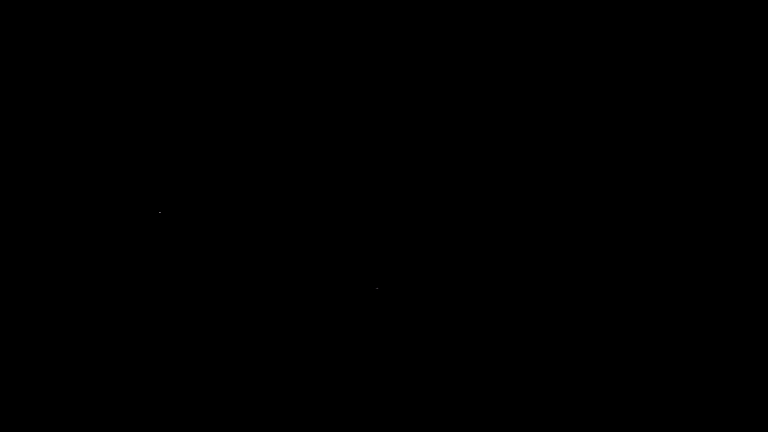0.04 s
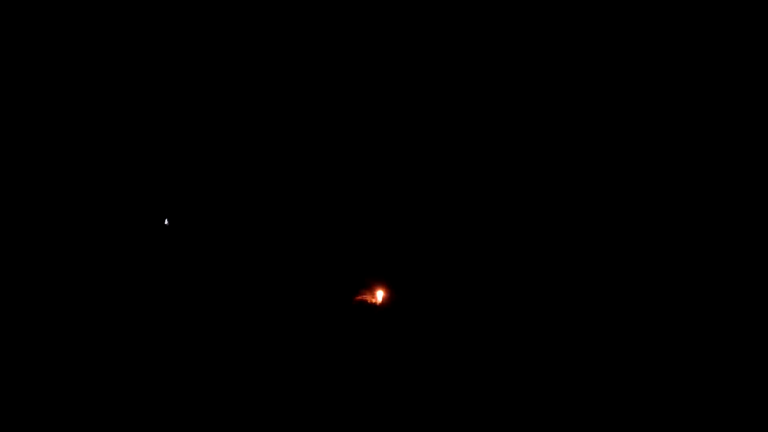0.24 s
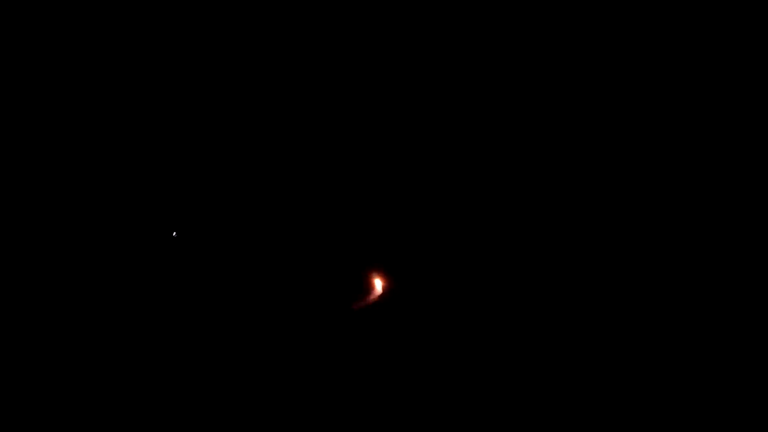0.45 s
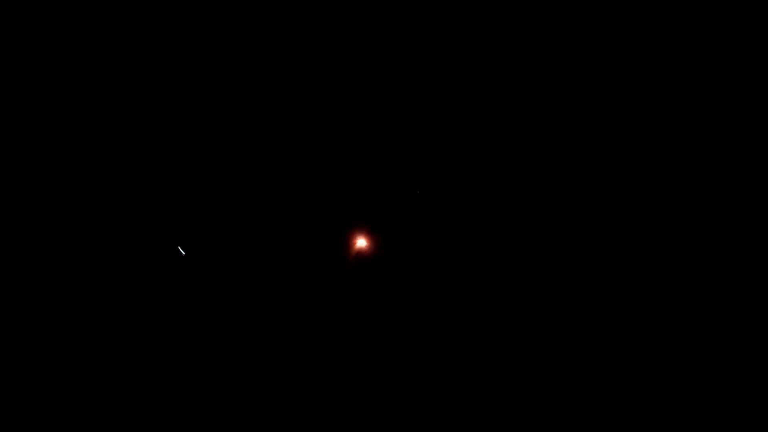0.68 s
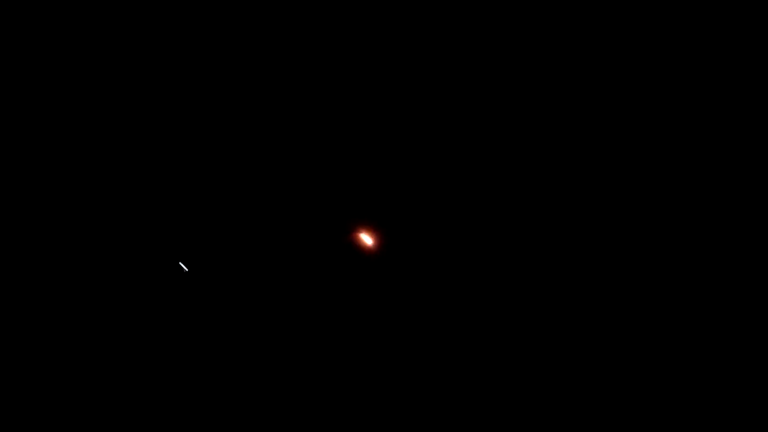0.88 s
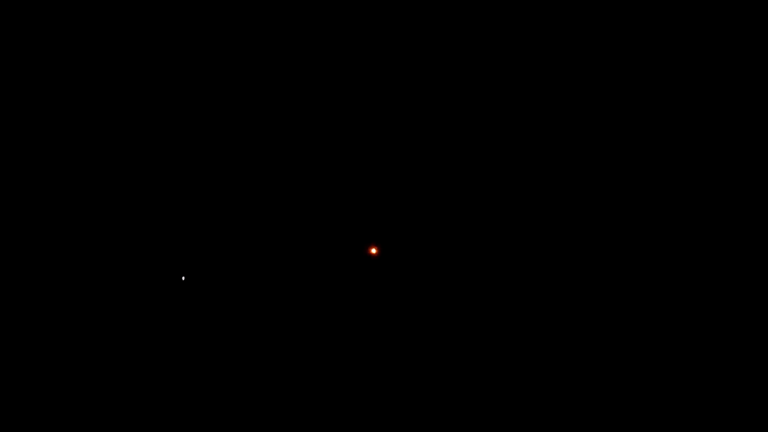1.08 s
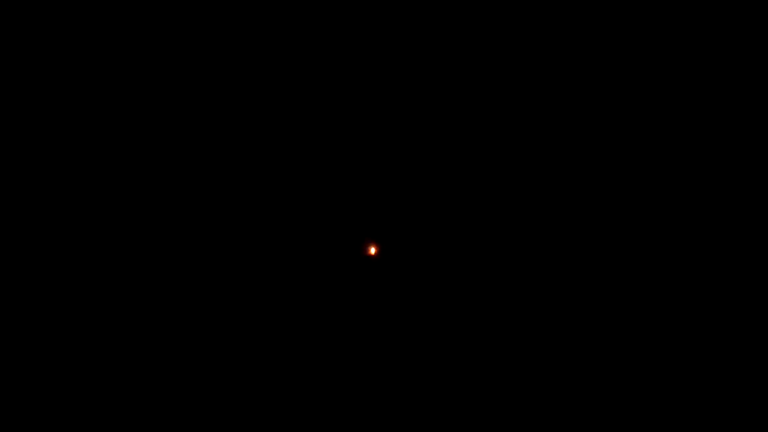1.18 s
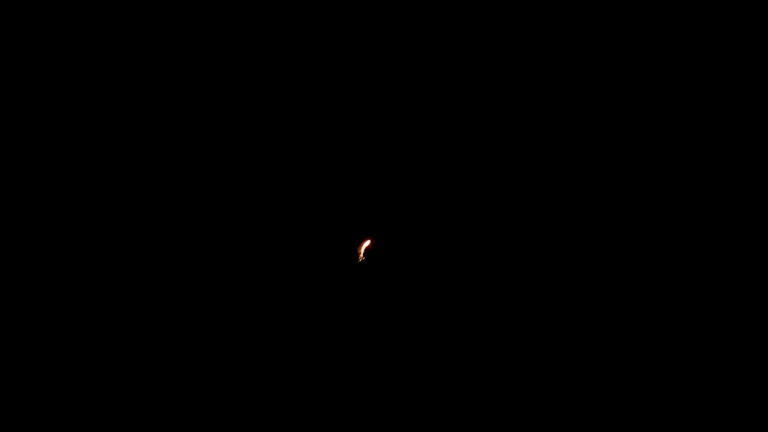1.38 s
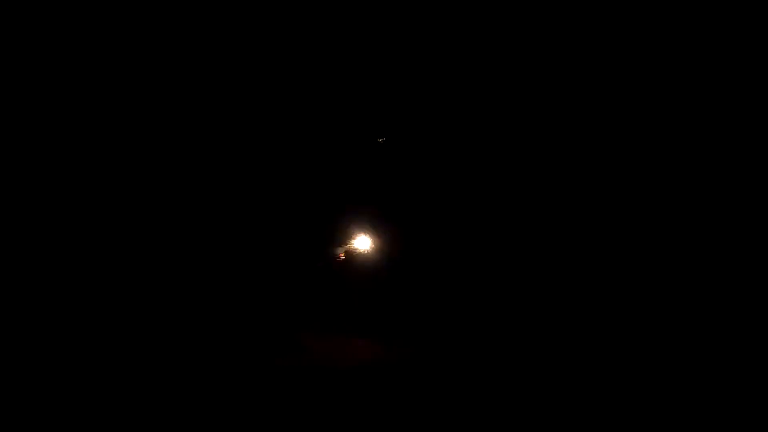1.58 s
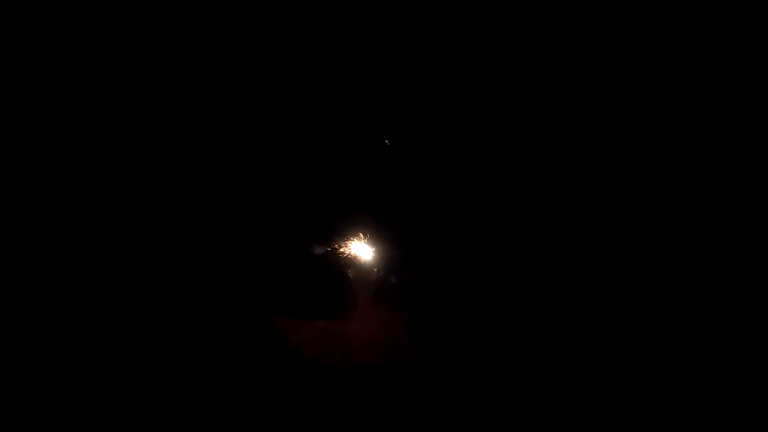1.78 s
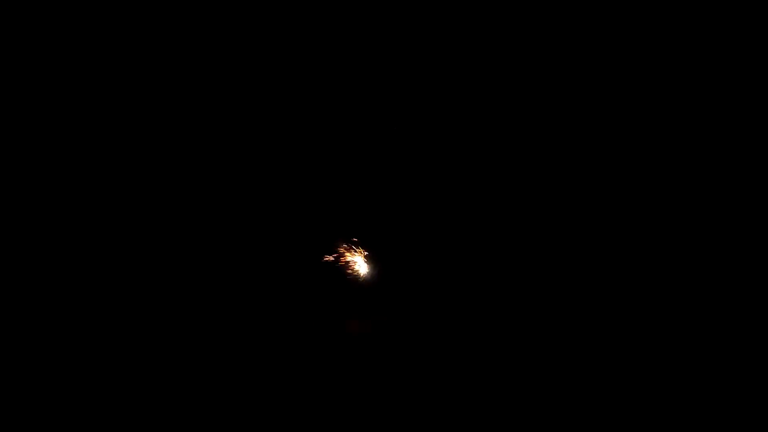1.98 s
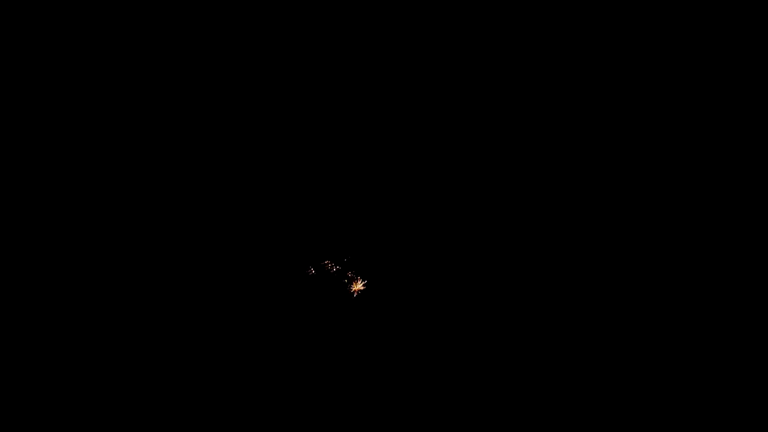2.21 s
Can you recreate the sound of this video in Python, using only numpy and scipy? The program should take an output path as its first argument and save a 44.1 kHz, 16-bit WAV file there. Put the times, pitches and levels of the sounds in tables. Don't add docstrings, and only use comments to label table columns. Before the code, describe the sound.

A firework rocket whistles shrilly as it climbs, stops, then bursts into sharp dry crackles.

```python
import sys
import numpy as np
from scipy import signal
from scipy.fft import rfft, irfft, next_fast_len
from scipy.io import wavfile
from scipy.ndimage import uniform_filter1d, map_coordinates

SR = 44100
rng = np.random.default_rng(int(sys.argv[2]) if len(sys.argv) > 2 else 0)


def natural_amplitude(level_db):
    exponent = np.asarray(level_db, float) / 20
    return 10 ** exponent


def unload_wav(signal):
    wavfile.write(
        sys.argv[1],
        SR,
        np.round(np.clip(np.atleast_2d(signal).T, -1, 1) * 32767).astype(np.int16),
    )


N = 99225
T = np.arange(N) / SR
LIGHT_S, OUT_S = 0.246, 1.288


def unit(x):
    return x / np.sqrt(np.mean(x ** 2, axis=-1, keepdims=True) + 1e-20)


def along(points, hz):
    f, v = np.transpose(points)
    return np.interp(np.log(hz + 1), np.log(f + 1), v)


def curves(rows):
    s, *cols = np.transpose(rows)
    return [np.interp(T, s, c) for c in cols]


def wobble(rate):
    return map_coordinates(rng.standard_normal(3000), [T * rate])


def filtered(x, response):
    m = next_fast_len(N + SR // 2)
    return irfft(rfft(x, m) * response(np.fft.rfftfreq(m, 1 / SR)), m)[..., :N]


def noise(spectrum):
    return unit(filtered(rng.standard_normal(N), lambda hz: natural_amplitude(along(spectrum, hz))))


# (time [s], pitch [Hz])
PITCH = [(.247, 2110), (.256, 2110), (.288, 2202), (.33, 2096), (.37, 2058), (.6, 1940), (.83, 1820),
         (1.11, 1726), (1.28, 1686)]


def pulse_phase():
    hz = uniform_filter1d(curves(PITCH)[0], SR // 100)
    flick = 71 * np.exp(-np.abs(OUT_S - T) / 0.0077)
    hz = hz + flick + 4.7 * wobble(89.84)
    return hz, 2 * np.pi * np.cumsum(hz) / SR


def pair(turn, pan_db, lead):
    share = natural_amplitude([pan_db / 2, -pan_db / 2])
    mean_size = np.abs(share[0] + share[1] * np.exp(1j * lead))
    both = np.maximum(mean_size, .7 * share.max(0))
    return 2 * share / both * np.sin([turn, turn - lead])


# (time [s], level [dB], left-right [dB])
BURN = [
    [(0.25, -15.5, 6.5), (0.28, -15, -4), (0.372, -22.5, 12.5), (0.41, -17, -1), (0.586, -22, 13.5),
     (0.616, -14.5, 15), (0.652, -19.5, -3), (0.69, -11, -4), (0.75, -24, -11)],
    [(0.765, -23.5, -4), (0.837, -12, 2), (0.881, -18, 4), (0.983, -21, 1), (0.997, -32, 6),
     (1.033, -20.5, -12.5), (1.133, -25.5, -4), (1.189, -23.5, 1), (1.285, -29.5, 2.5)],
]
# (time [s], second [dB], third [dB], fourth [dB])
OVERTONES = [
    [(.25, -23, -14.5, -34), (.3, -23, -16.5, -44), (.35, -27, -25, -35), (.42, -29, -24.5, -30),
     (.52, -28, -33, -36), (.57, -28, -36, -24), (.615, -20.5, -25.5, -23), (.7, -23, -27.5, -18),
     (.74, -22.5, -30.5, -27)],
    [(.775, -38.5, -23.5, -20), (.825, -26, -24.5, -17), (.88, -35.5, -23.5, -20),
     (.945, -36.5, -25.5, -24), (.99, -38.5, -31, -33), (1.035, -35, -29.5, -24), (1.11, -34, -34.5, -27),
     (1.18, -35.5, -31.5, -31), (1.28, -43.5, -35, -29)],
]
# (time [s], second [dB], third [dB], fourth [dB])
FACING = [(.27, 12, -19, 3), (.33, 10, -12, 11), (.55, 14, 1, -4), (.7, 3.5, 9, -9), (.81, -13, -1.5, -23),
          (.99, 8, -0.5, -15), (1.05, -5, -2, -9), (1.279, 4.5, -2, -5)]
# (time [s], tone [rad], second [rad], third [rad], fourth [rad])
LEAD = [(.27, -0.6, 0.73, 1.2, 0.5), (.38, 1.84, 1.5, -2.5, 2.5), (.54, -4.5, 1.6, -2.5, 2.5),
        (.63, -4.2, 2.24, -5.5, 1.1), (.72, -5, 1.8, -5, 1.8), (.87, -4.5, 4.2, -5.5, -0.2),
        (.99, -4.5, 4.4, -5.5, -0.5), (1.08, -5, 5.9, -7.5, -1), (1.28, -5.5, 4, -7.5, -0.6)]
HIGH_DB = [-17.5, -20, -22.5]
# (time [s], treble [dB])
EDGE = [(.25, 5.5), (.35, 0), (.58, 8.5), (.7, -3), (.85, -9), (1.28, -22.5)]
# (frequency [Hz], gain [dB])
GROUND = [(300, 0), (700, -4.5), (1100, 3.5), (1330, -5.5), (1600, -0.5), (14000, -5.5), (14600, -35),
          (16000, -35)]
# (frequency [Hz], gain [dB])
LEFT = [(300, -16.5), (2000, 0.5), (5000, -13), (8300, -7.5), (9500, -8), (12500, -36), (15000, -4)]
# (frequency [Hz], gain [dB])
RIGHT = [(300, -12.5), (2000, -6), (5700, -7), (6500, -2), (7300, -3.5), (9000, -8), (11800, 0),
         (15000, -4.5)]


def whistle_tone(hz, turn):
    fade_db, fade_rate, rough = 1.5, 14, 0.094
    level_db, pan_db = curves(BURN[0] + BURN[1])
    lead, *leads = curves(LEAD)
    sound = natural_amplitude(level_db + 4.5) * pair(turn, pan_db, lead)

    low_db = curves(OVERTONES[0] + OVERTONES[1])
    for k, db, pan, lag in zip((2, 3, 4), low_db, curves(FACING), leads):
        fading = natural_amplitude(db + 3.0 + fade_db * wobble(fade_rate))
        sound += fading * (1 + rough * wobble(400)) * pair(k * turn, pan, lag)

    edge_db = curves(EDGE)[0]
    for k, db in enumerate(HIGH_DB, 5):
        air_db = edge_db * k / 5 + along(GROUND, k * hz)
        port_db = np.array([along(LEFT, k * hz), along(RIGHT, k * hz)])
        twinkle = natural_amplitude(fade_db * np.array([wobble(fade_rate), wobble(fade_rate)]))
        partial = np.sin(k * turn + rng.uniform(0, 2 * np.pi, (2, 1)))
        sound += natural_amplitude(db + air_db + port_db) * twinkle * (1 + rough * wobble(400)) * partial
    return sound


# (time [s], level [dB])
STUTTER = [(.25, -24.5), (.33, -28.5), (.38, -17), (.46, -24), (.56, -22), (.68, -29), (.8, -52),
           (1.29, -45)]
HALF_DB = [-22, -16, -0.5, -16, -18.5]


def stutter(turn):
    ragged = sum(natural_amplitude(db) * wobble(260) * np.sin((k + 1.5) * turn) for k, db in enumerate(HALF_DB))
    return natural_amplitude(curves(STUTTER)[0]) * ragged


# (frequency [Hz], level [dB])
JET = [(300, -20.5), (1000, -3.5), (2400, -5.5), (3200, -0.5), (4800, -6.5), (7000, 6), (14000, -5.5)]


def jet_hiss():
    roar = noise(JET[:5] + [(6000, -40)])
    fizz = noise([(4000, -40)] + JET[4:])
    level_db = curves(BURN[0] + BURN[1])[0]
    steady_db = uniform_filter1d(level_db, SR // 4) - 18.5
    roar_db = 7 * (T - 1.46) + 1.96 * wobble(39.7)
    fizz_db = 2 + 0.74 * curves(EDGE)[0] + 3.4 * wobble(90.5)
    return natural_amplitude(steady_db) * (natural_amplitude(roar_db) * roar + natural_amplitude(fizz_db) * fizz)


def fuse():
    burning = (T > 0.197) * (T < LIGHT_S)
    return burning * natural_amplitude(-38 - 348 * np.abs(LIGHT_S - T)) * noise(JET[2:])


def puff(s, db, t60):
    return (T > s) * natural_amplitude(db - 60 * np.abs(T - s) / t60) * noise(JET)


def whistle():
    hz, turn = pulse_phase()
    lit = np.clip((T - LIGHT_S) / 0.0013, 0, 1) * np.clip((OUT_S - T) / 0.0049, 0, 1)
    gas = lit * (jet_hiss() + stutter(turn)) + fuse()
    gas = gas + puff(LIGHT_S, -27.5, 0.19) + puff(OUT_S, -45, 0.054)
    return lit * whistle_tone(hz, turn), gas


# time [s], peak [dB], answer of the near surface [dB], brightness [dB]
FIRST_POP = (1.6323, -26, -3, 0)
# (time [s], peak [dB], answer of the near surface [dB], brightness [dB])
POPS = [(1.6609, -7.5, -2.5, 7.5), (1.679, -28, -11, 1), (1.6917, -22, -2, -10.5), (1.6966, -24, -1, 2),
        (1.705, -13, -2, 14.5), (1.7087, -12.5, -3, 3), (1.7353, -29.5, -6, -5.5), (1.7765, -26, -7, 5),
        (1.7823, -20.5, -8, -2), (1.7848, -16.5, -3, -2), (1.7979, -9, -6.5, 0), (1.808, -16, -2.5, 11),
        (1.8188, -7.5, -3.5, 3.5), (1.822, -24, -7, -3), (1.836, -22.5, 3, 6), (1.8566, -8.5, -3, 0),
        (1.8719, -12.5, 1.5, 9), (1.909, -12, 1.5, 9), (1.9129, -5.5, -3, 5.5), (1.9183, -9.5, -8, 7),
        (1.925, -18, -0.5, 7), (1.929, -19.5, -4, 3), (1.9325, -26, -10, 5), (1.9385, -28, -6, 0),
        (1.9546, -2, -5, 8), (1.9612, -18, 2, 0), (1.9702, -35, -10.5, 3), (1.9775, -4.5, -2, -1.5),
        (1.9869, -9.5, -4, -7), (1.9934, -24, -7, -3), (1.9988, -20.5, -4, 4), (2.0027, -21, -18, -2),
        (2.0193, -24, -1, -4), (2.023, -4.5, -2.5, -5), (2.0321, -26, -7, -1), (2.0363, -6.5, -6, -1),
        (2.0407, -17, -5, 2), (2.0451, -25, -11, -1), (2.051, -17, -15, 4), (2.0676, -15.5, -1, 1),
        (2.0849, -9, -2.5, 0.5), (2.1174, -6.5, -4, 1), (2.1408, -27, -3, -2), (2.1469, -16.5, -1.5, 0.5),
        (2.1626, -10.5, -7, 2), (2.1783, -12, -1.5, 16), (2.2083, -3.5, -7, 3.5), (2.2102, -28, -6, 2.5)]
# (time [s], level [dB])
SPARKS = [
    (1.66, -59),
    (1.7, -47),
    (1.76, -48),
    (1.89, -51.5),
    (1.92, -35.5),
    (1.95, -40),
    (2.0, -43),
    (2.04, -37.5),
    (2.07, -61),
    (2.25, -50),
]


def crackle():
    out, t = np.zeros((2, N + SR)), np.arange(900) / SR
    chance = rng.random((int(700 * 0.61), 4))
    when = 1.65 + .6 * chance[:, 0]
    size_db = np.interp(when, *np.transpose(SPARKS)) - 3.5 * np.log(chance[:, 1])
    sparks = zip(when, size_db, -9 * chance[:, 2], 9 * chance[:, 3] - 3)
    for s, db, answer_db, bright_db in [FIRST_POP, *POPS, *sparks]:
        late = np.append(0, 0.0005 * rng.exponential(size=3))[:, None]
        size = np.append(1, natural_amplitude(-5) * rng.standard_normal(size=3))
        pulse_s = 58.6e-6 * natural_amplitude(-0.66 * bright_db)
        u = np.maximum(t - late, 0) / pulse_s
        blast = size @ ((t >= late) * np.exp(-u / 2) * np.cos(2 * u))
        dust = natural_amplitude(-11 - 60 * t / 0.0095) * rng.standard_normal((2, len(t)))
        level = natural_amplitude([[db + 1], [db + 1 + answer_db]])
        out[:, round(s * SR):][:, :len(t)] += level * (blast + dust)
    return out[:, :N]


# (delay [ms], left [dB], right [dB])
PATHS = [
    (0.404, 10, -8),
    (0.666, 9.5, 1.5),
    (.85, 1.5, -35),
    (1.786, 4.5, 16),
]


def ports(x, paths):
    ms, left_db, right_db = np.transpose(paths)

    def ways(hz, db):
        delays = np.exp(-2j * np.pi * np.outer(hz, ms / 1000))
        return delays @ natural_amplitude(db) * natural_amplitude(along(GROUND, hz))

    def response(hz):
        left = natural_amplitude(along(LEFT, hz)) * ways(hz, left_db)
        right = natural_amplitude(along(RIGHT, hz)) * ways(hz, right_db)
        return [left, right]

    return filtered(x, response)


# (frequency [Hz], t60 [s])
FAR = [(500, .5), (2000, 1.64), (5500, 1.58), (7000, 0.92), (12000, 2.04)]
# (frequency [Hz], gain [dB])
YARD = [(500, 4.5), (2000, 0.5), (7000, 0.5), (9000, -0.5), (15000, -8)]


def echoes(x):
    far_db, hill_db = -21, -41
    hz, t, z = signal.stft(rng.standard_normal((2, SR + SR // 2)), SR, nperseg=256)
    tail = signal.istft(z * natural_amplitude(-60 * t / along(FAR, hz)[:, None]), SR, nperseg=256)[1]
    far = np.pad(tail / np.linalg.norm(tail[0]), ((0, 0), (round(.12 * SR), 0)))
    seconds = np.arange(far.shape[1]) / SR

    late = seconds - .6
    hill = rng.standard_normal(far.shape) * (late > 0) * natural_amplitude(-60 * np.abs(late) / .4)
    far = far + natural_amplitude(hill_db - far_db) * hill / np.linalg.norm(hill[0])

    yard = rng.standard_normal(far.shape) * natural_amplitude(-60 * seconds / 0.14)
    yard = yard / np.linalg.norm(yard[0])

    x = filtered(x, lambda hz: natural_amplitude(along(YARD, hz)))
    blurred = x * wobble(150)
    far_answer = natural_amplitude(far_db) * signal.fftconvolve(blurred, far, axes=1)
    yard_answer = natural_amplitude(-9.5) * signal.fftconvolve(x, yard, axes=1)
    return (far_answer + yard_answer)[:, :N]


# (time [s], left [dB], right [dB])
WIND = [(0.0, -26.5, -13), (0.03, -53, -36.5), (0.11, -27, -32), (0.15, -54.5, -26), (0.22, -35.5, -26.5),
        (0.36, -51, -41), (0.38, -36.5, -26.5), (1.01, -29.5, -29.5), (1.15, -34.5, -34.5),
        (1.42, -35.5, -35), (1.47, -58, -38.5), (1.7, -31, -30), (1.74, -49, -32.5), (1.82, -29, -39),
        (1.93, -51.5, -41.5), (2.06, -41, -22.5), (2.1, -67, -44), (2.25, -49, -47)]
# (frequency [Hz], level [dB per Hz])
FLUTTER = [(20, -2), (60, -5.5), (110, 1), (230, -8), (400, -19), (800, -37.5), (1500, -107.5)]
# (frequency [Hz], level [dB per Hz])
RUMBLE = [(15, -5.5), (35, 2), (70, -1), (130, -14), (300, -30.5), (800, -60.5)]
# (time [s], left [dB], right [dB])
SLAPS = [
    (0.056, -40, -4.5),
    (0.103, -13, -12),
    (1.373, -10.5, -11),
    (1.409, -9, -30),
]


def wind():
    left_db, right_db = curves(WIND)
    flutter = natural_amplitude(left_db + 10.0) * unit(natural_amplitude(4 * wobble(45)) * noise(FLUTTER))
    swells = [unit(natural_amplitude(-0.5 * wobble(14.54)) * noise(RUMBLE)) for side in "LR"]
    left_bass_db = -30 + 0.089 * (left_db - left_db.mean())
    bass = natural_amplitude([left_bass_db, right_db]) * swells
    for s, *db in SLAPS:
        u = np.clip(T - s, 0, 1) / 0.0029
        slap = (1 - u / 2) * np.exp(-u / 2) * (1 - np.exp(-u ** 2 * 3))
        bass = bass + natural_amplitude(db)[:, None] * slap
    return np.minimum(T * 200, 1) * (bass + [flutter, 0 * T])


# (frequency [Hz], level [dB per Hz])
NIGHT = [(300, -26), (800, 2), (1500, -13), (7000, -19), (15000, -52.5)]


def night():
    return natural_amplitude(-65.5) * np.array([noise(NIGHT) for side in "LR"])


def scene():
    tone, gas = whistle()
    direct, bounced = crackle() + gas
    near = tone + ports(direct, PATHS[:3]) + ports(bounced, PATHS[3:])
    return near + echoes(near) + wind() + night()


def top_cut(x):
    return signal.sosfilt(signal.butter(12, 15190, fs=SR, output="sos"), x)


def record(dry):
    mix = dry / (1 + np.abs(dry / .98) ** 8) ** (1 / 8)
    return top_cut(mix)


dry = scene()
out = record(dry)
unload_wav(out)
```